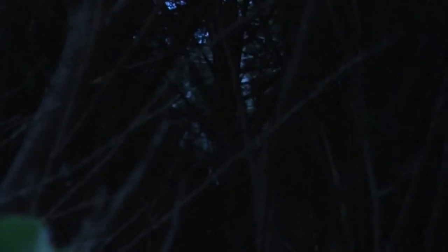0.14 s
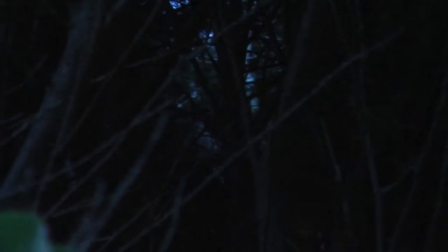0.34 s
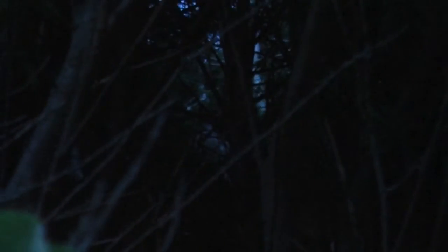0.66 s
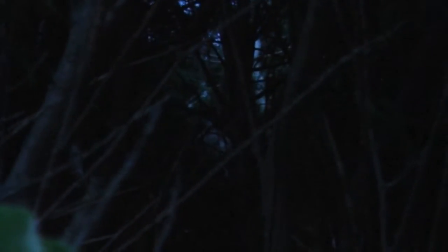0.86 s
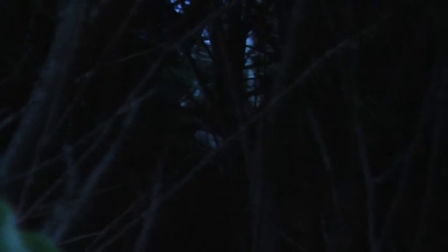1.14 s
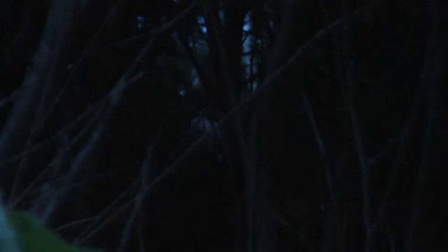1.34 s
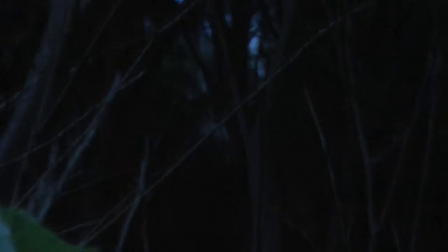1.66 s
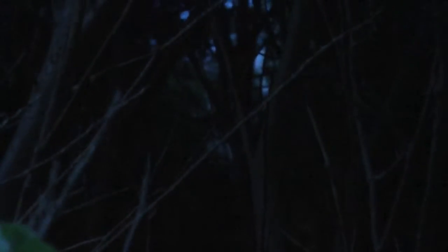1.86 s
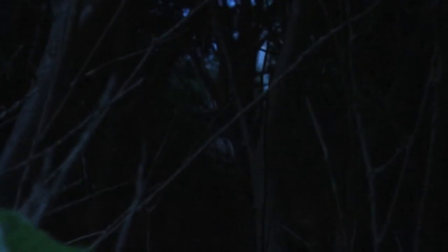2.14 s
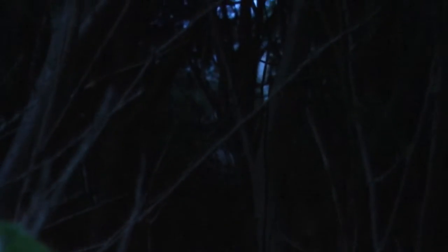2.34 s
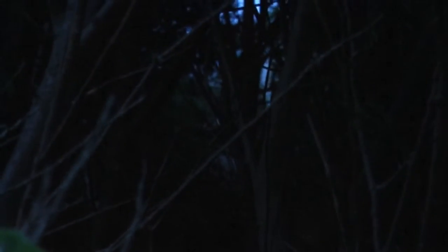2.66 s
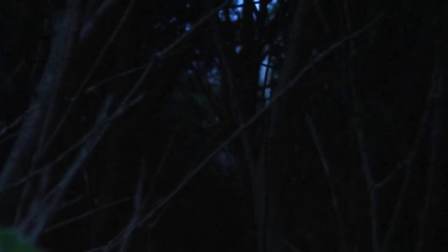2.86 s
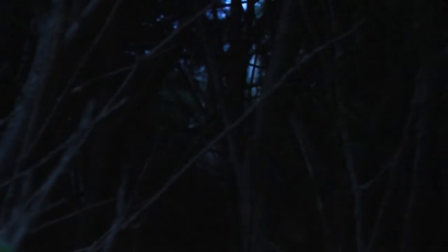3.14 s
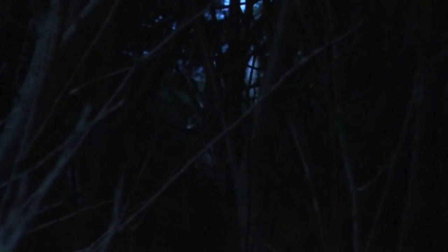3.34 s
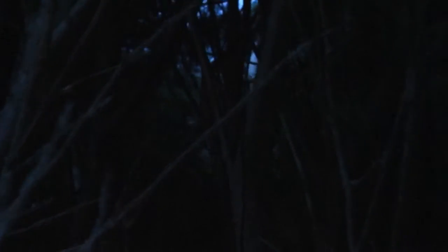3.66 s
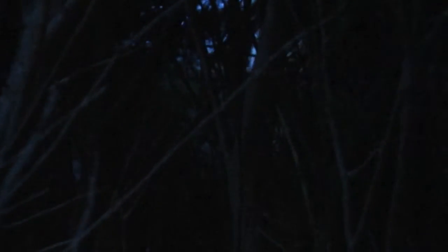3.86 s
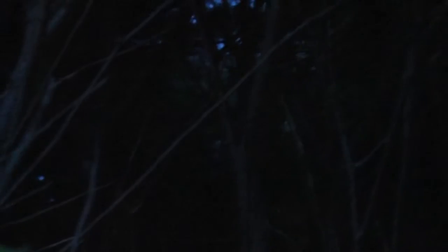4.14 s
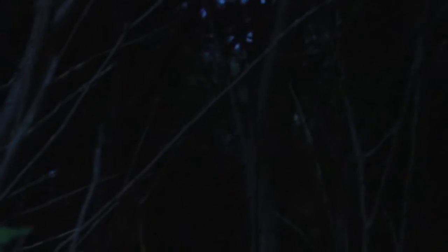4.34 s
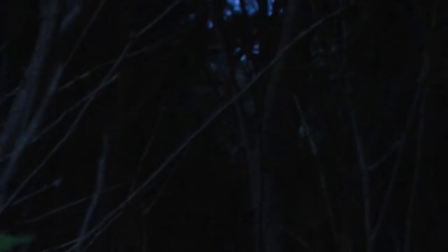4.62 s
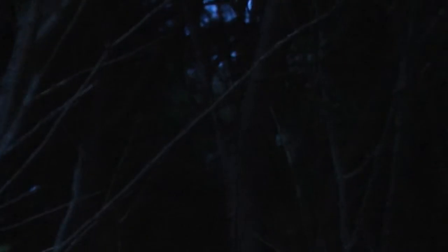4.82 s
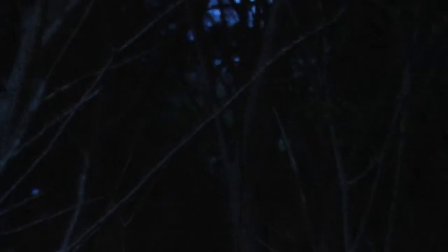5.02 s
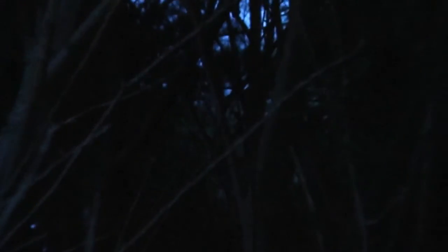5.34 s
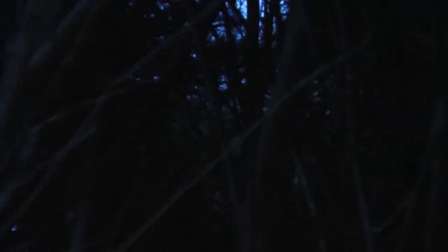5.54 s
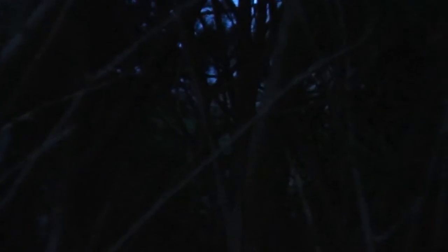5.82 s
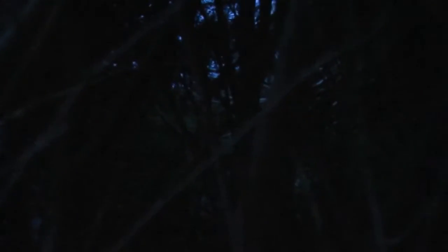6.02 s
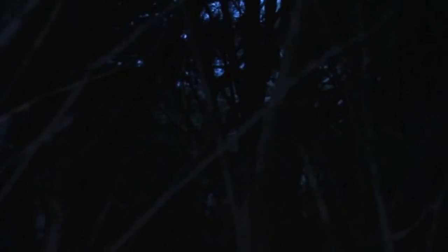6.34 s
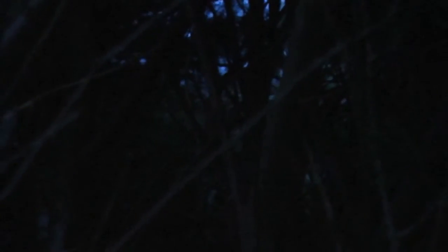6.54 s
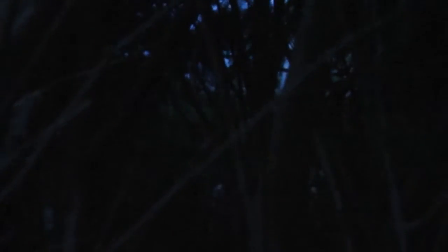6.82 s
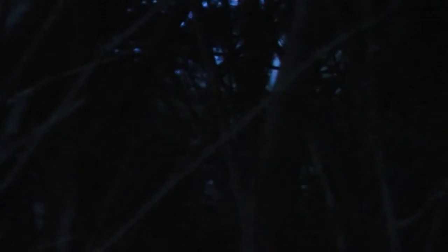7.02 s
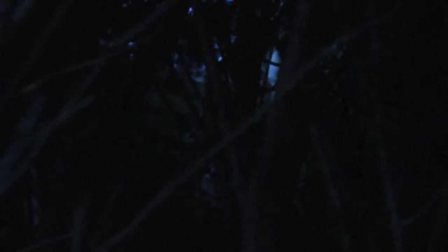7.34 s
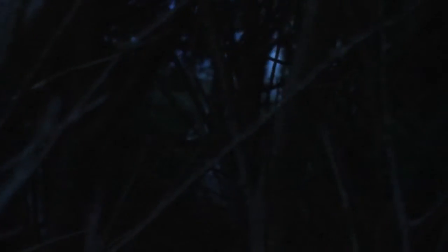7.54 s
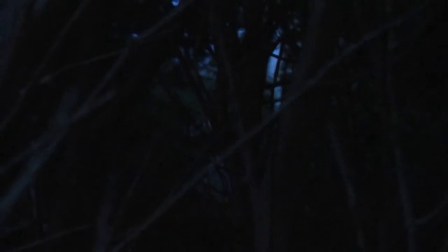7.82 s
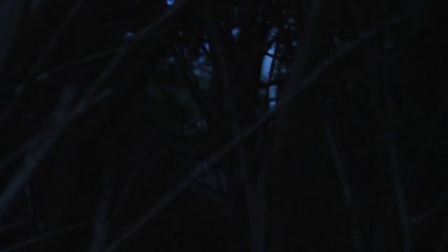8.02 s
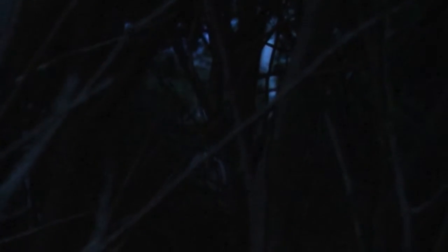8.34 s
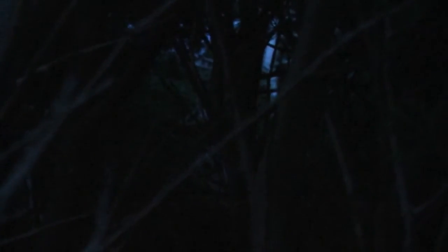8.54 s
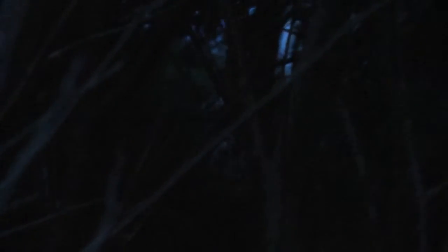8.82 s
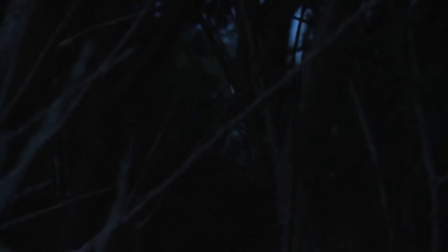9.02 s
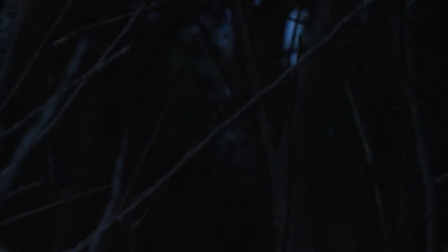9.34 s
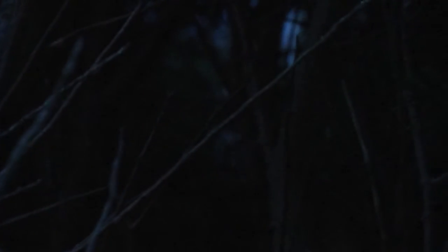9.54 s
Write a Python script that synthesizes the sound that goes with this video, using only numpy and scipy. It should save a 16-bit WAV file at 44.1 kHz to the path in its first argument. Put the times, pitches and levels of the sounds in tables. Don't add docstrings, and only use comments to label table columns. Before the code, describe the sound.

A wood at dusk, heard by a stereo pair among branches. Steady mid-high hiss with thin wavering motor whine runs throughout, over soft low engine rumble and tyre wash from distant cars, swelling around 3, 4, 6 and 8 seconds. Faint far peeps and chirps come in the first second. Two soft, dull twig ticks fall at 1.6 and 1.7. At 2.35 a young owl a short way off screams for half a second: a high, bright squeak sliding slightly downward, catching and breaking into rasp, with echoes from trunks and leaves. Light twig crackles cluster at 3.3 to 3.8. Weak peeps follow to 5.5. At 6.0 a twig snaps, sharp, dry and very close. At 6.4 the owl screams again, louder, fading slightly, with an echoing tail. From 7.5 to 9.5, faint hoarse chirps and soft low hoots far off.

```python
import sys
import numpy as np
from scipy import signal
from scipy.fft import rfft, irfft
from scipy.io import wavfile
from scipy.ndimage import uniform_filter1d

SR = 44100
rng = np.random.default_rng(int(sys.argv[2]) if len(sys.argv) > 2 else 0)


def amplitude_ratio(level_db):
    exponent = np.asarray(level_db, float) / 20
    return 10 ** exponent


def unload_wav(signal):
    wavfile.write(
        sys.argv[1],
        SR,
        np.round(np.clip(np.atleast_2d(signal).T, -1, 1) * 32767).astype(np.int16),
    )


N = 426447


def read(points, hz):
    f, value = np.transpose(points)
    return np.interp(np.log(hz + 1), np.log(f + 1), value)


def evened(x):
    return x / np.sqrt(np.mean(x ** 2) + 1e-20)


def to_db(gain):
    return 20 * np.log10(gain)


def add(mix, s, sound):
    part = mix[round(s * SR):][:len(sound)]
    part += sound[:len(part)]


def colour(x, gain):
    return irfft(rfft(x) * gain(np.fft.rfftfreq(x.shape[-1], 1 / SR)), x.shape[-1])


def drift(size, hz):
    return evened(colour(rng.standard_normal(size), lambda f: 1 / (1 + (f / hz) ** 4)))


def bump(t, at, width):
    return np.exp(-((t - at) / width) ** 2)


def soft_switch(t, at, width):
    return .5 + .5 * np.tanh((t - at) / width)


# (f/Hz, likeness [0 to 1])
LIKENESS = [(60, 0.95), (150, 0.74), (380, 0.78), (950, 0.79), (2380, 0.71), (5980, 0.79), (15000, 0.77)]


def wash(shape, patchy_db):
    frames, hz = N // 256 + 5, np.fft.rfftfreq(1024, 1 / SR)
    a, b, c, d, patches = rng.standard_normal((frames, 513, 5)).T
    patches = uniform_filter1d(patches, size=6, axis=0)
    patches = evened(uniform_filter1d(patches, size=20, axis=1))
    same = np.clip(read(LIKENESS, hz), -1, 1)[:, None]
    left = a + 1j * b
    right = same * left + np.sqrt(1 - same ** 2) * (c + 1j * d)
    spectra = np.array([left, right]) * amplitude_ratio(read(shape, hz)[:, None] + patchy_db * patches)
    return evened(signal.istft(spectra, nperseg=1024, noverlap=768)[1][:, :N])


# (f/Hz, level/dB)
HISS = [(1060, -22.5), (1800, -6.5), (2490, -11.5), (2860, -8), (3290, -13), (4260, -14), (4550, -12.5),
        (5230, -19), (6710, -16), (8700, -22), (10800, -19.5), (11800, -24), (15200, -28), (16000, -32),
        (16500, -56)]
# (f/Hz, level/dB)
MOTOR_LINES = [(2552, -82), (2891, -95.5), (3058, -90), (3483, -85), (3564, -83), (3758, -92), (4075, -91),
               (4500, -89.5), (4587, -87.5), (4689, -88.5), (4953, -89), (5706, -89.5), (6212, -97.5),
               (6751, -90), (7058, -93), (7768, -92.5), (7946, -93), (9884, -101.5), (10600, -88.5),
               (11122, -94.5)]


def camera():
    t = np.arange(N) / SR
    motor = np.zeros(N)
    for hz, db in MOTOR_LINES:
        level = amplitude_ratio(db + 2.5 + 3 * drift(N, 4.4))
        motor += level * np.cos(2 * np.pi * hz * t + 1.2 * drift(N, 3))
    return amplitude_ratio(-65.5) * wash(HISS, patchy_db=1.95) + motor


# (f/Hz, level/dB)
ENGINE_RUMBLE = [(15, -58), (25, -26), (81, -7.5), (123, -27), (210, -4), (361, -3), (600, -7.5),
                 (657, -8.5), (900, -10.5), (1170, -35), (1980, -120)]
# (f/Hz, level/dB)
TYRE_HISS = [(200, -56.5), (450, -29), (700, -7), (1100, 2.5), (1400, -1.5), (2000, -8), (2600, -16),
             (4000, -32.5), (8000, -71)]
# (t/s, length/s, tyre hiss level/dB, rumble level/dB)
CAR_PASSES = [
    (0.61, 0.13, -62, -57.5),
    (2.07, .2, -61.5, -60),
    (2.85, .3, -57, -61.5),
    (4.006, .5, -55.5, -60.5),
    (4.85, 0.18, -57, -55.5),
    (6.103, 0.99, -53.5, -61.5),
    (7.999, 0.77, -55, -62),
    (9.45, 0.47, -56.5, -59),
]


def traffic():
    t = np.arange(N) / SR
    tyre_power = np.full(N, amplitude_ratio(2 * -60.5))
    rumble_power = np.full(N, amplitude_ratio(2 * -57.5))
    for s, length, tyre_db, rumble_db in CAR_PASSES:
        swell = bump(t, s, length)
        tyre_power += amplitude_ratio(2 * tyre_db) * swell
        rumble_power += amplitude_ratio(2 * rumble_db) * swell
    rumble = np.sqrt(rumble_power) * wash(ENGINE_RUMBLE, patchy_db=1.5)
    tyres = np.sqrt(tyre_power) * wash(TYRE_HISS, patchy_db=1.26)
    return rumble + tyres * amplitude_ratio([[-.4], [.4]])


def peep(length, top_hz, glide_hz, db, arch, hoarse=0.0031):
    u = np.linspace(-1, 1, round(length * SR))
    hz = top_hz * (1 - arch * u ** 2) + u * glide_hz / 2
    hz = hz * (1 + hoarse * drift(len(u), 150))
    flutter = amplitude_ratio(db + 2 + 1.6 * drift(len(u), 40))
    return flutter * np.sin(2 * np.pi * np.cumsum(hz) / SR) * signal.windows.tukey(len(u), .4)


# (t/s, length/s, pitch f/Hz, glide/Hz, level/dB)
CLEAR_PEEPS = [(.058, .063, 3700, 250, -66.5), (.645, .03, 4250, -50, -73), (1.045, .05, 3710, 80, -72),
               (1.475, .012, 7830, -1700, -60), (1.849, .33, 1100, -11, -65), (2.9, .15, 3070, 450, -72),
               (3.02, .11, 2330, -100, -66.5), (3.119, .139, 2240, -20, -68),
               (3.645, .037, 3180, -100, -69), (4.08, .18, 2880, -15, -68.5), (5.131, .065, 4650, 250, -68),
               (5.42, .05, 3795, -17, -69), (7.574, .01, 7650, -1400, -67), (8.85, .43, 404, 16, -60.5),
               (9.518, .17, 729, -13, -63.5)]
# (t/s, length/s, top f/Hz, glide/Hz, level/dB)
HOARSE_CHIRPS = [(.31, 0.021, 4650, -300, -72), (.57, 0.017, 4900, -400, -71),
                 (0.598, 0.034, 5080, 150, -65), (.825, 0.091, 8040, 500, -72), (.87, .08, 7100, 130, -75),
                 (7.496, 0.067, 4620, 500, -69), (7.814, 0.1, 4590, 181, -61.5),
                 (7.826, 0.062, 9240, 700, -73), (7.916, .104, 4980, 60, -68.5),
                 (8.219, 0.086, 4550, 270, -70), (8.599, 0.075, 4700, 880, -68.5),
                 (8.969, .1, 4860, 110, -68), (9.361, 0.093, 4870, -110, -67.5)]


def birds():
    out = np.zeros(N)
    for s, *call in CLEAR_PEEPS:
        add(out, s, peep(*call, arch=.012))
    for s, *call in HOARSE_CHIRPS:
        add(out, s, peep(*call, arch=.09, hoarse=.033))
    return out


# (t/s, peak level/dB, colour f/Hz, colour width/Hz, t60/s)
TWIG_TICKS = [(1.571, -36, 900, 1200, .022), (1.690, -36, 900, 1100, .02), (2.048, -50, 2700, 800, .03),
              (2.049, -52, 8500, 5000, .06), (3.340, -56, 6000, 6000, .04), (3.571, -50, 2500, 6000, .05),
              (3.578, -44, 3000, 3000, .04), (3.585, -47, 6000, 8000, .03), (3.590, -45, 3500, 6000, .06),
              (3.627, -48, 5000, 6000, .04), (3.632, -44, 2300, 1500, .04), (3.637, -45, 3500, 6000, .05),
              (3.845, -52, 8500, 3000, .06), (7.395, -56, 3500, 1500, .03)]


def ticks():
    out, t = np.zeros(N), np.arange(4096) / SR
    for s, db, hz, width, t60 in TWIG_TICKS:
        puff = evened(colour(rng.standard_normal(len(t)), lambda f: bump(f, hz, width)))
        add(out, s, .5 * puff * amplitude_ratio(db - 60 * t / t60))
    return out


# (f/Hz, level/dB, t60/s)
TWIG_MODES = [(314, -8, 0.037), (563, -17, 0.076), (1250, -11, 0.017), (2710, -2.5, 0.01),
              (3800, -14, 0.018), (6900, -0.5, 0.005), (10800, 0.5, 0.01), (10490, -24, .04)]


def snap():
    snap_s, snap_db = 6.0259, -12
    out, t = np.zeros(N), np.arange(4096) / SR
    crack = colour(rng.standard_normal(len(t)), lambda f: f / (f + 200) / (1 + (f / 11000) ** 6))
    crack = crack * (amplitude_ratio(-60 * t / .009) + amplitude_ratio(-21 - 60 * t / .065))
    ring = sum(amplitude_ratio(db - 60 * t / t60) * np.sin(2 * np.pi * hz * t) for hz, db, t60 in TWIG_MODES)
    burst = (crack + 0.39 * ring) * np.minimum(t / .0005, 1)
    thin = signal.butter(2, 260, "high", fs=SR)
    add(out, snap_s, amplitude_ratio(snap_db) * signal.lfilter(*thin, burst))
    add(out, snap_s - .0018, amplitude_ratio(snap_db - 30) * crack)
    return out


# (f/Hz, t60/s)
TRUNK_DECAY = [(500, .9), (2300, 1.2), (4500, 1.1), (9000, 0.68), (14000, 0.26)]


def wood(x):
    taps = np.zeros((2, 2 * SR))
    at = np.arange(130, 2 * SR - 20, 20) + rng.integers(0, 20, (2, (2 * SR - 131) // 20))
    np.put_along_axis(taps, at, rng.choice([-1., 1.], at.shape), 1)
    hz, t, z = signal.stft(taps, SR, nperseg=128)
    near = amplitude_ratio(-60 * t / 0.18)
    far = amplitude_ratio(-16.5 - 60 * t / read(TRUNK_DECAY, hz)[:, None])
    tail = signal.istft(z * (near + far), SR, nperseg=128)[1]
    return signal.fftconvolve(x[None], tail / np.linalg.norm(tail[0]), axes=1)[:, :N]


# (t/s, length/s, dip level/dB, pitch sag/Hz)
BREATH_CATCHES = [
    (2.47, .008, -1, 0),
    (2.525, .01, -2, 40),
    (2.538, .006, -8, 15),
    (2.572, .007, -7, 25),
    (6.6105, .011, -12, 15),
]
# (t/s after its start, f/Hz)
PITCH = [(0, 2509), (.045, 2487), (.085, 2406), (.115, 2420), (.175, 2453), (.24, 2379), (.39, 2237),
         (.46, 2209), (.49, 2178)]


def controls(start, effort_db, swell_db, uneven_s, flare_s):
    length_s, release_s, drop_s = .491, .44, .466
    break_s, break_width_s = .23, .06
    t = np.arange(0, length_s, 1 / SR)

    catches = np.array([bump(((start + t - s) / length) ** 2, 0, 0.92) for s, length, _, _ in BREATH_CATCHES])
    dips_db, sags_hz = np.transpose(BREATH_CATCHES)[2:] @ catches

    tune = uniform_filter1d(np.interp(t, *np.transpose(PITCH)), size=600, mode="nearest")
    scoop_hz = 200 * np.exp(-t / .014)
    hz = tune - scoop_hz - 90 * soft_switch(t, drop_s, .005) - sags_hz

    attack_db = -28 * np.clip(1 - t / .003, 0, 1)
    release_db = -21.5 * np.clip((t - release_s) / (length_s - release_s), 0, 1) ** 2
    level_db = effort_db + swell_db * t + dips_db + release_db + attack_db

    flare = bump(t, .04, flare_s)
    late_db = 3.5 * soft_switch(t, break_s + break_width_s / 2, break_width_s / 2)
    uneven = soft_switch(t, uneven_s, .007) * amplitude_ratio(-20 + late_db)
    half_db = level_db + to_db(amplitude_ratio(-43) + amplitude_ratio(-26) * flare + uneven)

    rasp = amplitude_ratio(-35 - 8 * t)
    rasp = rasp + amplitude_ratio(-26) * flare + amplitude_ratio(-32) * catches.sum(axis=0)
    rasp += amplitude_ratio(-29.5) * bump(t, break_s, break_width_s) + amplitude_ratio(-22) * soft_switch(t, drop_s, .01)
    quarter = amplitude_ratio(-28) + amplitude_ratio(-20) * flare + amplitude_ratio(-8) * bump(t, .29, .11)
    return hz, level_db, half_db, to_db(rasp), to_db(quarter)


# (f/Hz, level/dB)
THROAT_LOW = [(2150, -8.5), (2500, -9.5), (4300, 0), (4550, 2.5), (4950, -2), (6500, -8), (7400, -13),
              (8700, -1), (9900, 1.5)]
# (f/Hz, level/dB)
THROAT_HIGH = [(10800, -10), (12300, -14), (13300, -25.5), (14300, -30.5), (14800, -42.5), (16500, -46.5)]
# (f/Hz, width/Hz, level/dB)
LEAF_DIPS = [(2435, 35, -5), (2250, 78, -4.5), (4670, 16, -10), (4397, 50, -9.5), (8925, 60, -2.5),
             (7430, 60, -6.5)]
BEAK_SHIFT = [-1.2, .2, 1., 0]
# (f/Hz, level/dB)
HALF_LINES = [(1200, -15), (3300, -13), (3650, -8), (5800, 0), (7800, -8), (10000, 3), (11000, -3),
              (12300, -1), (15500, -14)]
# (f/Hz, level/dB)
RASP_COLOUR = [(1000, -40.5), (3400, -30.5), (4100, -4), (5200, 6.5), (10000, 5), (15500, 2)]


def scream(start, *shape):
    hz, level_db, half_db, rasp_db, quarter_db = controls(start, *shape)
    size = len(hz)
    t = np.arange(size) / SR
    beak_db = (shape[0] + 20.5) * soft_switch(-t, -.23, .03)
    jitter = 1 + .035 * amplitude_ratio(rasp_db) * drift(size, 150)
    turn = 2 * np.pi * np.cumsum(hz * jitter) / SR

    def line(k, db):
        return amplitude_ratio(db + 3.5) * np.cos(k * turn + 2 * np.pi * rng.random())

    clean = np.zeros(size)
    for k in range(1, 8):
        f = k * hz
        if k < 5:
            leaf_db = sum(db * bump(f, at, width) for at, width, db in LEAF_DIPS)
            tone_db = read(THROAT_LOW, f) + leaf_db + BEAK_SHIFT[k - 1] * beak_db + 1.1 * drift(size, 20)
        else:
            tone_db = read(THROAT_HIGH, f) + 0.65 * beak_db + 3 * drift(size, 28)
        clean += line(k, level_db + tone_db + .5 * drift(size, 75))

    ragged = np.clip((rasp_db + 30) / 10, .1, .35)

    def uneven(k, db):
        broken = 1 - ragged + ragged * drift(size, 180)
        return line(k, db + read(HALF_LINES, k * hz)) * broken * amplitude_ratio(2.5 * drift(size, 20))

    halves = sum(uneven(k, half_db) for k in np.arange(1, 14, 2) / 2)
    quarters = sum(uneven(k, half_db + quarter_db - 8 * (k < 2)) for k in np.arange(3, 28, 2) / 4)

    bursts = amplitude_ratio(rasp_db + .3 + 2.5 * drift(size, 60))
    shake = drift(size, 1500) + 0.65 * drift(size, 280) * np.cos(turn / 2)
    rasp = colour(clean * bursts * shake, lambda f: amplitude_ratio(read(RASP_COLOUR, f)))
    return (clean + halves + quarters + rasp) * signal.windows.tukey(size, .01)


# (t/s, effort level/dB, swell/dB per s, pulses turn uneven after/s, onset flare length/s)
OWL_SCREAMS = [
    (2.3478, -23, 2, .15, 0.03),
    (6.381, -17.5, -6.5, .19, .01),
]


def owl():
    out = np.zeros(N)
    for start, *shape in OWL_SCREAMS:
        add(out, start, scream(start, *shape))
    return out


# (f/Hz, level/dB)
PAIR_LEVEL = [(1200, -1.5), (2350, 1.1), (4600, -1.9), (7000, 2), (9400, 1.4), (12000, 1.7), (15000, 1)]
# (f/Hz, phase/rad)
PAIR_PHASE = [(1000, -.1), (4500, .1), (9600, 0), (11500, -.05), (12300, -0.38), (13300, .4), (15000, -.4)]


def scene():
    voice, far = owl(), birds()
    half = np.array([[.5], [-.5]])

    def pair(f):
        return amplitude_ratio(half * read(PAIR_LEVEL, f)) * np.exp(1j * half * read(PAIR_PHASE, f))

    direct = colour(voice, pair)
    sway = .3 + .7 * drift(N, 70)
    echoes = wood(amplitude_ratio(-13.5) * voice * sway + amplitude_ratio(-5) * far)
    echoes += .45 * echoes[::-1].copy()
    return direct + far + echoes + ticks() + snap() + traffic() + camera()


def notches(hz):
    zero, pole = .93, .78
    late = np.exp(-1j * np.pi * hz / 300)
    odd = pole + (zero - pole) / (1 + (hz / 4200) ** 12)
    even_comb = (1 - zero * late) / (1 - pole * late)
    odd_comb = (1 + odd * late) / (1 + pole * late)
    return even_comb * odd_comb


def top_cut(x):
    return signal.sosfilt(signal.butter(12, 16830, fs=SR, output="sos"), x)


def record(dry):
    def response(f):
        return notches(f) * (f < 15740) * f ** 2 / (f ** 2 + 35 ** 2)

    mix = colour(dry, response)
    return top_cut(mix)


dry = scene()
out = record(dry)
unload_wav(out)
```